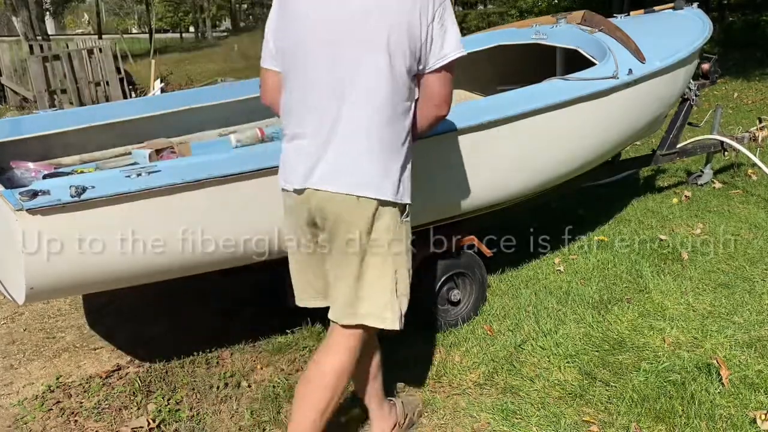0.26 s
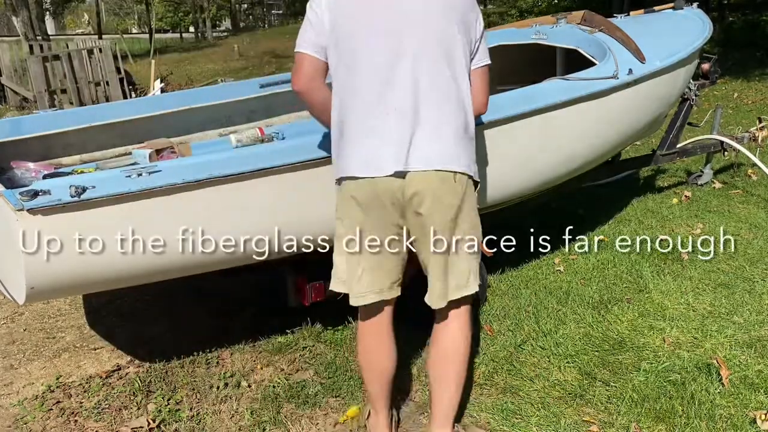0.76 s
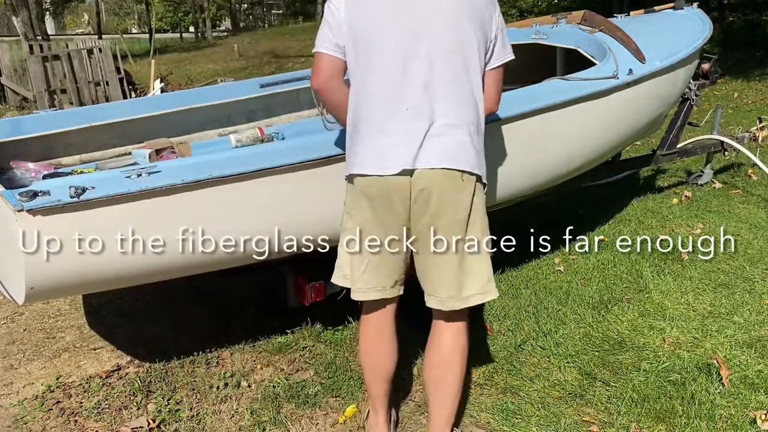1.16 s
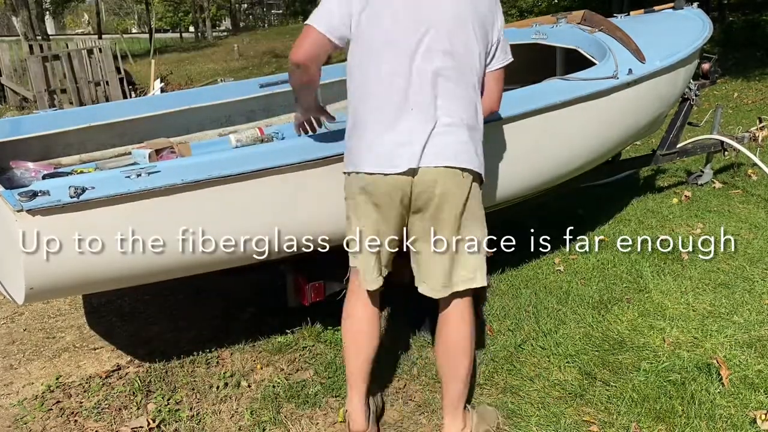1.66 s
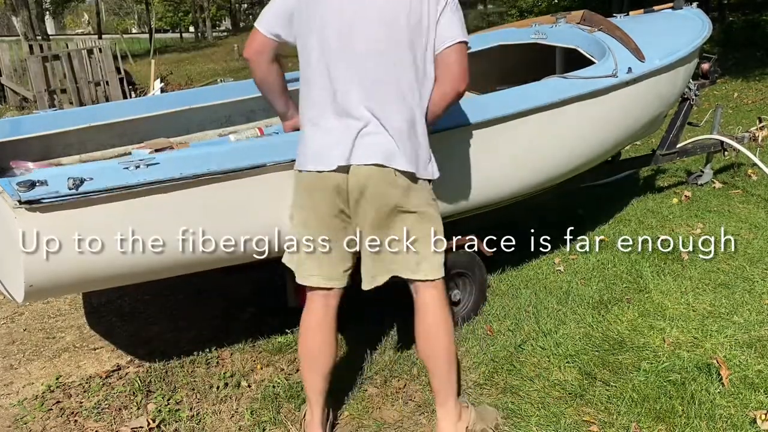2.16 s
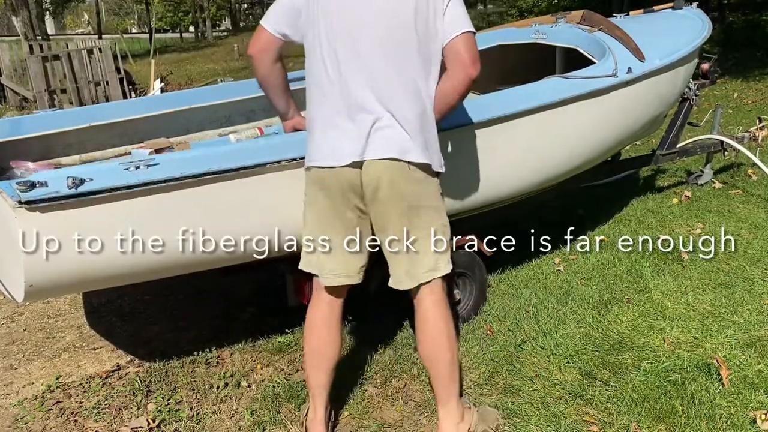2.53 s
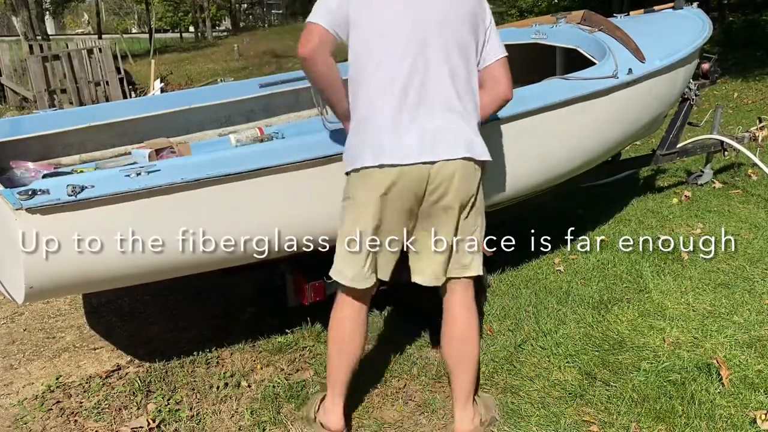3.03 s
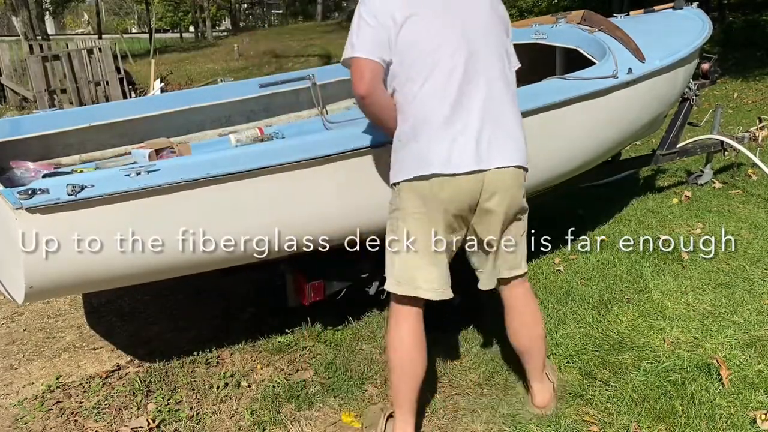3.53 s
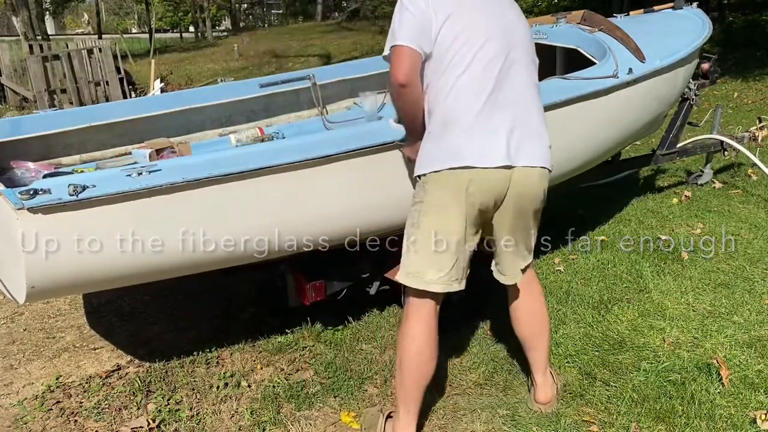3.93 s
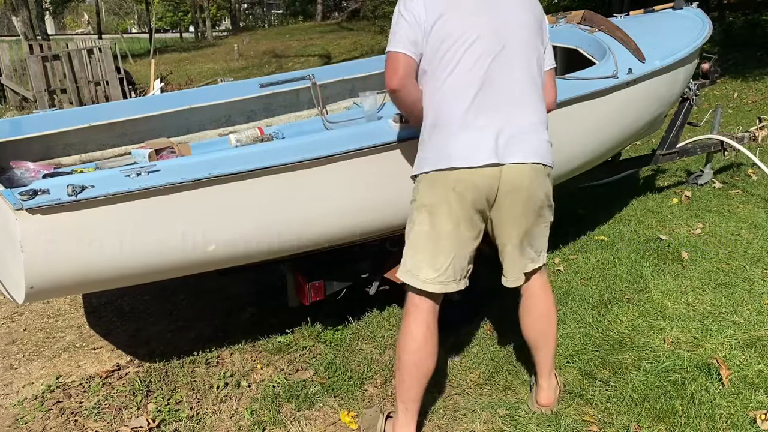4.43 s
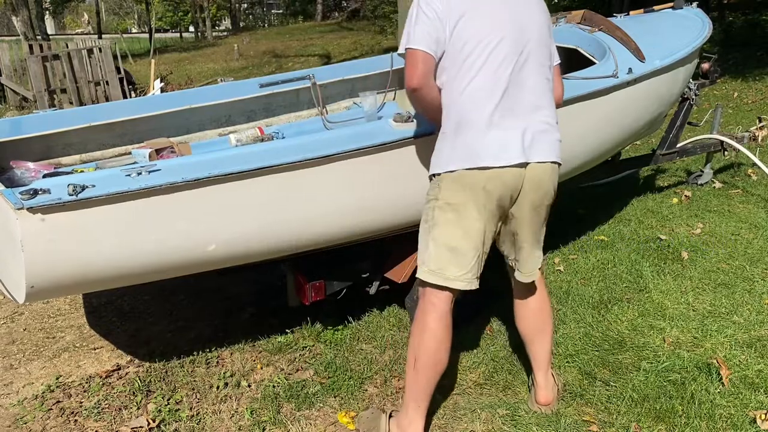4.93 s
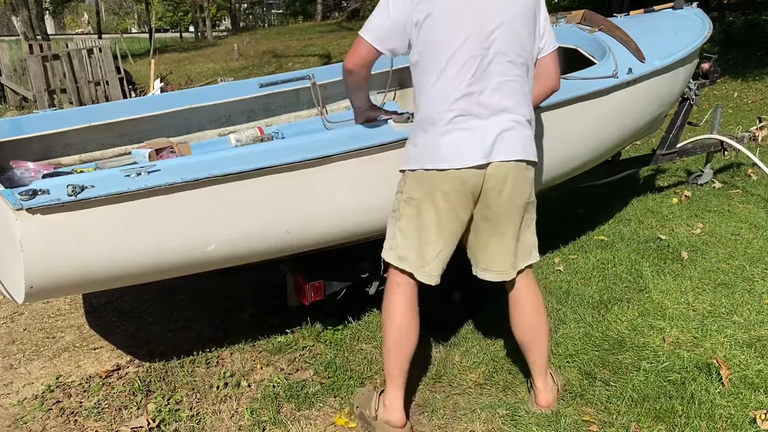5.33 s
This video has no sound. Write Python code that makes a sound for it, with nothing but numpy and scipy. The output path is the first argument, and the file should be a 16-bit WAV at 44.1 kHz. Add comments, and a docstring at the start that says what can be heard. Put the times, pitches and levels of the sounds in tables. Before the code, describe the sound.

Outdoors on a lawn, a fiberglass cap is pried off a small hollow boat hull, heard in close, dry stereo slightly left of center. From 0 to 0.3 seconds, rapid cracks, woody creaks and hollow knocks tumble together. A strong, sharp snap with a boxy hull thump lands at 0.72, followed at once by several more until 0.85. Then it is mostly quiet: tiny ticks, soft grass brushing, and a dull low bump near 1.8. From 2.33 to 2.7 a crackling, splintering run tears along, with dry treble flakes. Another pause, then medium cracks and knocks at 3.64 to 3.8. At 4.22 to 4.3 comes the loudest burst, hard bright cracks with a hollow boom. Weaker knocks follow at 4.6 and 4.83, and small crackles at 5.2 to 5.4. Underneath are a faint low motor drone, soft air hush and very faint bird chirps, mainly around 5 seconds.

```python
"""Bursts of sharp snaps come first, as a fibreglass deck cap is pried off a small boat hull on a lawn.
Breaking fibres are noise bursts under exponential decays; hull and lip are resonances they excite.
Gelcoat flakes tick as high-passed noise, and the hull rocks on its trailer as damped low sines.
Behind lie noise brushing the grass, a far motor as narrow-band noise and birds as gliding sines;
two spaced microphone ports hear the treble at different phases."""
import sys
import numpy as np
from scipy import signal
from scipy.fft import rfft, irfft, next_fast_len
from scipy.io import wavfile
from scipy.ndimage import map_coordinates

SR = 44100
rng = np.random.default_rng(int(sys.argv[2]) if len(sys.argv) > 2 else 0)


def wav_record(signal):
    """Record a signal, one row per channel, as 16-bit PCM in the file named by sys.argv[1]."""
    frames = np.transpose(np.atleast_2d(signal))
    bounded = np.clip(frames, -1, 1)
    # unit amplitude maps onto the largest positive 16-bit level
    quanta = np.round(bounded * 32767).astype(np.int16)
    wavfile.write(sys.argv[1], SR, quanta)


N = 246078

# Levels in the tables are relative ones, before the layers are mixed.
# Snaps of the joint: (time [s], crack level [dB], hull knock re crack [dB], lip clack re crack [dB],
# splinter pitch [Hz], splinter level re crack [dB])
JOINT_SNAPS = [(0.0156, -17.5, 4, -20, 7400, -14.5), (0.1, -35.5, 28, 8, 1490, -13),
               (0.113, -33.5, 0, 16, 1470, -12), (0.1319, -27, 24, 13.5, 1200, 0),
               (0.1823, -17, 4, 7, 1700, -5), (0.2121, -28, 3, 14.5, 1770, 5),
               (0.229, -23.5, 21.5, -30, 1834, -15), (0.244, -16, 2, -22, 1160, -26),
               (0.4362, -48.5, 1, 13, 1480, -4), (0.63, -35, -18, -1, 1633, 4), (.64, -41, -23, 5, 1861, 9),
               (0.65, -43, -24, -6, 1450, 2), (0.7214, -5, -1, 0, 1670, -5), (0.73, -19, 10, 5, 1520, 4),
               (0.7725, -14.5, 3, -8, 1720, -5), (.783, -17.5, -7, 1, 1954, 0),
               (0.7933, -13.5, 3.5, -13, 1260, -14), (0.816, -39, 0, -10, 1262, -14),
               (1.065, -38, -15, -21, 2020, -18), (1.153, -41, 0, 0.5, 2024, -17),
               (1.3098, -44.5, -21, 9, 1210, -2), (1.4788, -29, -25.5, -17, 1350, -9.5),
               (1.5829, -40, -24, -22, 4130, -7), (1.6047, -46.5, -13, 5, 1650, 0),
               (1.676, -43, -12, 5, 1458, -4), (1.787, -38, 5, -4, 1246, -5),
               (1.83, -35, -18, -24, 1260, -17), (2.0806, -56.5, 24.5, 23.5, 1439, -5),
               (2.142, -50, 8, 13, 1470, -11), (2.1711, -33, -1, 1.5, 1712, -15),
               (2.3328, -31, 2, -9, 2900, -11), (2.3582, -17.5, 9, 8, 2912, -7),
               (2.369, -19.5, 0, 5.5, 1290, 5.5), (2.3845, -21, -8, -13, 1310, 1),
               (2.527, -27.5, 2.5, -17, 5600, -18), (2.5612, -26.5, 12, -26, 1850, -2),
               (2.5889, -26.5, 13, 0, 4000, -8), (2.599, -27, 5, 6.5, 3035, -5),
               (2.611, -26.5, 7, 4, 5720, -5.5), (2.6827, -31, -4, -18, 2920, 0.5),
               (2.692, -35, -8, -13, 5725, 1), (2.81, -39, -8, -25, 1810, -17),
               (2.882, -42.5, -12, 3.5, 1296, -2.5), (2.9707, -48, -23, 16.5, 1280, -8),
               (3.3339, -34, -10, -13, 1834, -12), (3.6392, -27.5, 18, -4, 1243, -10),
               (3.6478, -19, -10, -16, 1385, -25), (3.6883, -18.5, -8, -20, 1490, -28),
               (3.7938, -36, 9, 4, 1461, -12), (3.807, -46, -1.5, -3, 1323, -12),
               (3.9553, -42, -35, -20, 1579, -21), (4.218, -22, 7, 10, 7194, -8),
               (4.2259, -6.5, -32, 7, 3012, -15), (4.245, -7, 0.5, 4.5, 7110, -10),
               (4.2515, -10, 3, 1, 1370, -4), (4.258, -3, 3.5, 5, 6926, -12.5),
               (4.278, 0, 0, -31, 6832, -13.5), (4.589, -44, 29, 12, 1330, -13),
               (4.6079, -36, -4.5, -9, 1252, -12.5), (4.663, -38.5, -8, -22.5, 2580, -20.5),
               (4.82, -44, 12.5, -12, 1335, -7), (4.8418, -35, 16.5, -15, 1192, -12.5),
               (5.184, -43, -8, -20, 4385, -3), (5.198, -55, -14, -6, 3300, 6),
               (5.2142, -42.5, -28, 10.5, 1650, 5.5), (5.2758, -48, -18, 15, 1350, 5),
               (5.3035, -45.5, -2.5, 13, 2980, -3), (5.3353, -28.5, -17, -10, 4340, -7),
               (5.378, -33, -19, -25, 3010, -4), (5.3925, -25, -12.5, 1, 3050, -20)]
# Pulls that tear the glue line: (grip [s], let-go [s], fibre level at grip [dB], at let-go [dB],
# hull level at grip [dB], at let-go [dB], settled pitch of the bent panel [Hz], its overtone [dB])
GLUE_TEARS = [(0, 0.058, -42.5, -55, -19.5, -33, 358, -1.5),
              (0.1, 0.119, -46, -35.5, -19.5, -12.5, 329.1, -5.5),
              (0.134, 0.221, -26, -36.5, -10.5, -15, 314.7, -1.5),
              (0.229, 0.241, -38, -40, -9.5, -13.5, 293.7, -14.5),
              (0.249, 0.297, -41, -68, -23, -30.5, 297.4, -5),
              (0.622, 0.642, -49, -38.5, -49, -53, 280.8, -6),
              (0.726, 0.748, -25, -21, 1.5, -9.5, 275.5, -5.5),
              (0.764, 0.799, -30, -28, -7, -6.5, 321.3, -9),
              (0.814, 0.866, -33.5, -69, -17, -39.5, 300.4, -5.5),
              (1.429, 1.487, -49, -63, -55, -59, 281, -4), (1.756, 1.791, -64, -42.5, -38, -35, 306, -9.5),
              (2.088, 2.226, -67, -67, -54, -46, 300, 1), (2.361, 2.39, -27, -28, -13.5, -10.5, 323, -11),
              (2.399, 2.46, -36, -42.5, -16, -30, 322.4, -3),
              (2.542, 2.559, -37.5, -36.5, -39, -45, 304, -6),
              (2.564, 2.678, -31.5, -58, -30.5, -41.5, 304.4, -4),
              (2.681, 2.698, -23, -43, -41.5, -21, 298.7, -6),
              (3.615, 3.632, -55, -64, -35.5, -45, 304, -5),
              (3.639, 3.669, -34.5, -36.5, -15.5, -9.5, 339.8, -9),
              (3.685, 3.713, -54, -64, -16, -20.5, 350.6, -13),
              (3.796, 3.818, -54, -66, -21, -27.5, 398.7, -8.5),
              (4.215, 4.232, -29, -26, -20.5, -16, 400, 0.5), (4.244, 4.267, -18, -22, -14, -9, 372, -2),
              (4.283, 4.295, -19.5, -27.5, 2, -1, 355.6, -14),
              (4.305, 4.339, -34.5, -50, -7, -19, 350, -11.5),
              (4.591, 4.602, -47, -59, -27.5, -18.5, 315.5, -0.5),
              (4.606, 4.66, -46.5, -65, -34, -43, 269.6, -5.5),
              (4.832, 4.856, -50, -51, -23, -26.5, 289.9, -8.5),
              (5.36, 5.396, -58, -45, -27, -31, 291, -9.5)]
# Resonances of the hollow hull: (frequency [Hz], width [Hz], level [dB])
HULL_MODES = [(144, 34, 0), (219, 10, 6.5), (261.7, 36, 6.5), (325.5, 83, 3.5), (348.3, 38.8, 3),
              (436.5, 48, -1), (468, 170, -6.5), (571, 205, -5.5), (731, 74, -5.5)]
# Resonances of the cap's lip: (frequency [Hz], width [Hz], level [dB])
LIP_MODES = [(812, 76, -0.5), (1106, 109, 0), (1380, 140, -3.5), (1890, 500, -9.5)]
# Spectrum of breaking fibres: (frequency [Hz], density [dB per Hz])
FIBRE_SPECTRUM = [(300, -20), (1000, -2.5), (2000, -4.5), (3000, 0.5), (5000, -4.5), (7000, -3),
                  (10000, -2.5), (13000, -11), (16500, -10)]
# Dry ticks of flaking gelcoat: (time [s], level [dB])
FLAKE_TICKS = [(.2614, -51), (1.8941, -59), (1.9057, -60), (1.953, -61), (2.5015, -43), (2.5245, -30),
               (2.5614, -30), (2.6502, -34), (2.672, -34), (2.681, -29.5)]
# The hull rocks on the trailer: (time [s], sway level [dB], bounce level [dB])
TRAILER_THUMPS = [(0.129, -47, -25), (0.719, -45, -25), (1.045, -27, -51), (1.286, -52, -52),
                  (1.447, -53, -38), (1.535, -65, -46), (1.801, -20, -30.5), (2.233, -43, -35),
                  (2.376, -42, -23), (2.608, -20.5, -28.5), (3.708, -21.5, -32.5), (4.236, -28, -16),
                  (4.623, -27, -31.5), (4.831, -29, -31.5), (5.401, -18.5, -29.5)]
# Sway, bounce and overtone of the bounce: (frequency [Hz], t60 [s], level [dB])
TRAILER_MODES = [(57.8, 0.22, -2), (98.6, 0.41, -6), (180.5, 0.21, -6)]
# Reflections off ground and hull side: (left delay [s], right delay [s], level [dB])
NEAR_BOUNCES = [(.0013, 0.0026, -13.5), (.0034, 0.0022, -15), (.0052, 0.0047, -15.5)]
# Reverberation from fence and trees: (frequency [Hz], t60 [s])
YARD_DECAY = [(100, 0.6), (300, 0.36), (1000, 0.31), (5000, 0.34), (14000, 0.11)]
# Bird calls: (time [s], length [s], start pitch [Hz], end pitch [Hz], arch midway [Hz], level [dB])
BIRD_CALLS = [(.57, 0.086, 4250, 4200, 2, -72), (4.924, 0.034, 3550, 2706, -100, -62.5),
              (5.015, 0.1, 3980, 4000, 96, -62), (5.125, 0.052, 4060, 4020, 68, -68),
              (5.529, 0.068, 4140, 4010, 47, -63)]
# Stirs of grass and cloth: (time of peak [s], level [dB], swell over 15 dB [s], fade over 15 dB [s])
GRASS_STIRS = [(.3, -62, 0.023, 0.41), (.442, -56, 0.051, 0.034), (.62, -56, 0.052, 0.046),
               (.84, -45, 0.021, 0.13), (1.312, -56.5, 0.059, 0.016), (1.492, -46, 0.068, 0.0073),
               (1.61, -62, 0.22, 0.0074), (1.684, -56, 0.11, 0.031), (1.792, -50.5, 0.058, 0.098),
               (2.18, -56.5, 0.2, 0.026), (2.337, -48, 0.0058, 0.036), (2.721, -53.5, 0.021, 0.35),
               (3.059, -51.5, 0.04, 0.016), (3.173, -51.5, 0.049, 0.27), (3.518, -57, 0.065, 0.072),
               (3.797, -54, 0.034, 0.035), (3.959, -59, 0.011, 0.019), (4.361, -51.5, 0.029, 0.42),
               (4.592, -55, 0.024, 0.047), (4.84, -51.5, 0.026, 0.064), (5.219, -54.5, 0.065, 0.0078),
               (5.403, -48.5, 0.13, 0.037), (5.57, -62, .2, .02)]
# Spectrum of the grass: (frequency [Hz], density [dB per Hz])
GRASS_SPECTRUM = [(200, 3), (600, -5.5), (1500, -0.5), (3000, -6), (5000, -9.5), (8000, -13.5),
                  (12000, -17), (16500, -19.5)]
# Spectrum of the outdoor hush: (frequency [Hz], density [dB per Hz])
AIR_SPECTRUM = [(12, -46.5), (20, -16.5), (53, 5.5), (88, -6), (122, -4), (156, -16), (222, -22),
                (1100, -30), (1220, -33), (3240, -35), (8000, -42.5), (11000, -54.5), (16000, -49)]
# Far drone: (time [s], motor level [dB], rumble level [dB])
DRONE_LEVELS = [(0, -22, -30), (.12, -40, -49), (.26, -31, -40), (.45, -58.5, -45.5), (.84, -44, -30),
                (1.2, -59, -71), (1.69, -46.5, -52), (2.21, -47.5, -50.5), (2.56, -33, -35.5),
                (2.81, -50.5, -36.5), (3.1, -56, -71), (3.6, -49, -62), (3.85, -40.5, -46.5),
                (4.32, -63, -52), (4.71, -48.5, -48.5), (5.14, -46.5, -65.5), (5.58, -45.5, -40.5)]
# Spacing of the ports: (frequency [Hz], phase by which left leads [rad])
PORT_PHASE = [(400, 0), (1800, .4), (2100, 1.4), (2600, .6), (4500, .1), (6100, .7), (6800, .2),
              (10200, -5), (11500, -6.6), (13800, -10), (16500, -12.5)]
# Left-right likeness of diffuse noise: (frequency [Hz], likeness [correlation, 0 to 1])
PORT_LIKENESS = [(60, 0.8), (240, 0.68), (950, 0.043), (3770, 0.71), (15000, 0.71)]

CRACK_T60_S, RING_T60_S, KNOCK_T60_S = 0.021, 0.031, 0.0049  # crack, splinter, hull knock
GRIP_T60_S, FIBRE_T60_S, HULL_T60_S = .011, 0.07, 0.047  # quick rise at the grip, falls after the let-go
BITE_RISE, BITE_S = .2, .004  # share by which the panel is sharp at the grip, time constant of the bend
TICK_T60_S, TICK_HZ = 0.022, 5940
TOP_HZ = 15900  # band limit


def snaps():
    """Brittle fracture: each break releases a burst of energy that decays exponentially."""
    t = np.arange(SR // 5) / SR
    crack, ring, knock, blow, clack = np.zeros((5, N + len(t)))
    for s, db, knock_db, clack_db, hz, ring_db in JOINT_SNAPS:
        start = round(s * SR)
        at = slice(start, start + len(t))
        fall = -60 * t / CRACK_T60_S
        scrape, flutter = rng.standard_normal((2, len(t)))
        # the first fibres break hardest
        first_fibres = 1 + 2.0 * np.exp(-t / 0.0014)
        crack[at] += amp(db + fall) * (1 - np.exp(-t / 0.00047)) * first_fibres
        # the splinter that lets go buzzes round a pitch of its own
        buzz = np.sin(2 * np.pi * hz * t + .13 * np.cumsum(flutter))
        ring[at] += amp(db + ring_db - 2 - 60 * t / RING_T60_S) * buzz
        knock[at] += amp(db + knock_db - 3.0 - 60 * t / KNOCK_T60_S)
        # the jolt that starts the knock
        blow[at] += amp(db + knock_db + 3.5) * np.exp(-t / 0.00027)
        clack[at] += amp(db + clack_db + 6.0 + fall) * scrape
    return crack[:N], ring[:N], knock[:N], blow[:N], clack[:N]


def tears():
    """Sustained fracture: a pull loads the glue line, and the bent panel's pitch sags as it settles."""
    tear, boom, panel_hz, overtone = np.zeros((4, N))
    for grip, let_go, fibre_db, fibre_end_db, hull_db, hull_end_db, hz, over_db in GLUE_TEARS:
        add(tear, grip, let_go, fibre_db, fibre_end_db, GRIP_T60_S, FIBRE_T60_S)
        add(boom, grip, let_go, hull_db, hull_end_db, GRIP_T60_S, HULL_T60_S)
        at = max(round((grip - GRIP_T60_S) * SR), 0)
        from_grip_s = np.abs(np.arange(at, N) / SR - grip)
        # sharpest under the bar at the grip; each pull holds until the next
        panel_hz[at:] = hz * (1 + BITE_RISE * np.exp(-from_grip_s / BITE_S))
        overtone[at:] = amp(over_db)
    return tear, boom, panel_hz, overtone


def fibres(spiky_db):
    """Superposition of many small fractures: spiky noise with the spectrum of breaking fibres."""
    return unit(filtered(grit(spiky_db), lambda hz: amp(along(FIBRE_SPECTRUM, hz))))


def bent_panel(panel_hz, overtone):
    """Stick-slip oscillation: it locks loosely onto the panel, so pitch and level waver."""
    turn = 2 * np.pi * np.cumsum(panel_hz + 32 * wobble(120)) / SR
    return (np.sin(turn) + overtone * np.sin(1.65 * turn)) * amp(1.9 * wobble(70))


def joint():
    """Excitation and resonance: snaps and tearing shake the fibres, the hollow hull and the cap's lip."""
    crack, ring, knock, blow, clack = snaps()
    tear, boom, panel_hz, overtone = tears()
    push = knock + boom
    hull = resonate(push * amp(3.5) * grit(spiky_db=3.5) + blow, HULL_MODES)
    # the bent panel also sounds by itself
    hull += amp(-6.0) * push * bent_panel(panel_hz, overtone)
    lip_drive = clack + amp(6.5) * np.sqrt(tear * boom) * grit(spiky_db=-0.5)
    lip = resonate(lip_drive, LIP_MODES)
    cracking = amp(-13.5) * crack * fibres(spiky_db=6.1)
    tearing = amp(-5) * tear * fibres(spiky_db=2.5)
    return cracking + ring + tearing + hull + lip


def flakes():
    """Impulsive radiation of light chips: short puffs of noise, treble only."""
    env = np.zeros(N)
    for s, db in FLAKE_TICKS:
        add(env, s, s, db, db, .003, TICK_T60_S)

    def treble(f):
        highpass = (1j * f / (TICK_HZ + 1j * f)) ** 4
        return highpass / (1 + 1j * f / (1.5 * TICK_HZ)) ** 3
    return env * unit(filtered(rng.standard_normal(N), treble))


def trailer():
    """Damped harmonic motion: soft low swings with a slow start."""
    out, t = np.zeros(N + SR), np.arange(SR // 2) / SR
    onset = 1 - np.exp(-t / 0.005)
    sway, bounce, over = [amp(db - 60 * t / t60) * onset * np.sin(2 * np.pi * hz * t)
                          for hz, t60, db in TRAILER_MODES]
    for s, sway_db, bounce_db in TRAILER_THUMPS:
        out[round(s * SR):][:len(t)] += amp(sway_db) * sway + amp(bounce_db) * (bounce + over)
    return out[:N]


def bounces(x):
    """Early reflection: near surfaces return middle and treble to each port at its own delay."""
    def response(f):
        echo = sum(amp(db) * np.exp(-2j * np.pi * f * np.array([[left], [right]]))
                   for left, right, db in NEAR_BOUNCES)
        return echo * (1j * f / (700 + 1j * f)) ** 2
    return filtered(x, response)


def yard(x):
    """Diffuse reverberation: each frequency dies at its own speed; bass passes the fence unanswered."""
    hz, t, z = signal.stft(rng.standard_normal((2, SR // 2)), SR, nperseg=256)
    decay = amp(-60 * t / along(YARD_DECAY, hz)[:, None])
    tail = signal.istft(z * decay, SR, nperseg=256)[1]
    x = filtered(x, lambda f: 1j * f / (400 + 1j * f))
    delayed = np.pad(x, (300, 0))[None]  # delay in samples
    return signal.fftconvolve(delayed, tail / np.linalg.norm(tail[0]), axes=1)[:, :N]


def birds():
    """Frequency modulation: thin, slightly husky whistles, with a fainter second note on held ones."""
    out = np.zeros(N + SR)
    for s, length, from_hz, to_hz, arch_hz, db in BIRD_CALLS:
        u = np.linspace(0, 1, round(length * SR))
        arch = np.sin(np.pi * u)
        pitch_hz = from_hz + (to_hz - from_hz) * u + arch_hz * arch
        husk = 0.03 * np.cumsum(rng.standard_normal(len(u)))
        phase = 2 * np.pi * np.cumsum(pitch_hz) / SR + husk
        held = to_hz > .9 * from_hz
        notes = np.sin(phase) + .3 * held * np.sin(1.42 * phase)
        out[round(s * SR):][:len(u)] += amp(db) * np.sqrt(np.abs(arch)) * notes
    return out[:N]


def grass():
    """Friction noise: each brush of feet swells and fades with a fine random flicker."""
    brushing_db = 2 * wobble(25) + 2 * wobble(400)
    stir = np.zeros(N)
    for s, db, swell, fade in GRASS_STIRS:
        add(stir, s, s, db, db, swell * 60 / 15, fade * 60 / 15)  # times over 15 dB become t60
    return stir * amp(brushing_db) * rush(GRASS_SPECTRUM)


def drone():
    """Narrow-band resonance of noise: a fuzzy far motor and a lumpy rumble."""
    motor_db, rumble_db = curves(DRONE_LEVELS)
    motor = unit(resonate(rng.standard_normal(N), [(90.0, 3.3, 2), (111.2, 9.4, 2.5)]))
    narrow = resonate(rng.standard_normal(N), [(54.4, 9.5, 0)])
    rumble = unit(resonate(narrow, [(56, 290, 0)]))
    far = amp(motor_db) * motor + amp(rumble_db + 2.7 * wobble(6.7)) * rumble
    return far * amp([[.5], [-.5]])  # slightly left


def background():
    """Incoherent addition: drone, grass underfoot and a steady outdoor hush."""
    return drone() + grass() + amp(-48.0) * rush(AIR_SPECTRUM)


def rush(spectrum):
    """Partial coherence: stereo noise of rms 1, partly alike in both ports."""
    def response(hz):
        turn = np.arccos(np.clip(along(PORT_LIKENESS, hz), -1, 1)) / 2
        return amp(along(spectrum, hz)) * [np.cos(turn), np.sin(turn)]
    mid, side = filtered(rng.standard_normal((2, N)), response)
    return unit(spaced(mid) + np.array([side, -side]))


def spaced(x):
    """Interaural-style phase difference: one source at both ports, half the phase gap on each side."""
    return filtered(x, lambda hz: np.exp(.5j * along(PORT_PHASE, hz) * np.array([[1], [-1]])))


def resonate(x, modes):
    """Modal superposition: x through causal resonances of alternating sign."""
    def response(f):
        return sum((-1) ** k * amp(db) * 1j * f * width / (hz * hz - f * f + 1j * f * width)
                   for k, (hz, width, db) in enumerate(modes))
    return filtered(x, response)


def filtered(x, response):
    """Linear filtering: the spectrum of x times a complex response of frequency."""
    m = next_fast_len(N + SR // 2)
    return irfft(rfft(x, m) * response(np.fft.rfftfreq(m, 1 / SR)), m)[..., :N]


def grit(spiky_db):
    """Amplitude modulation of noise: rms 1, made of grains with uneven sizes."""
    return unit(rng.standard_normal(N) * amp(spiky_db * wobble(700)))


def wobble(rate):
    """Interpolated randomness: a smooth random curve, rate knots a second."""
    knots = rng.standard_normal(int(N * rate / SR) + 4)
    return map_coordinates(knots, [np.arange(N) * rate / SR])


def add(out, start, end, start_db, end_db, rise_t60, fall_t60):
    """Exponential envelope, added to out: rise, a straight slope in dB from start to end, fall."""
    s = [start - max(rise_t60, .002), start, max(end, start + 1 / SR), end + max(fall_t60, .004)]
    at = np.arange(max(round(s[0] * SR), 0), min(round(s[-1] * SR), N))
    out[at] += amp(np.interp(at / SR, s, [start_db - 60, start_db, end_db, end_db - 60]))


def curves(rows):
    """Linear interpolation in time: one value per sample for each column after the time."""
    s, *cols = np.transpose(rows)
    return [np.interp(np.arange(N) / SR, s, c) for c in cols]


def along(points, hz):
    """Logarithmic frequency scale: (Hz, value) points interpolated on a log axis."""
    f, v = np.transpose(points)
    return np.interp(np.log(hz + 1), np.log(f + 1), v)


def amp(db):
    """Decibel law: dB to amplitude gain."""
    return 10 ** (np.asarray(db) / 20)


def unit(x):
    """Power normalisation: x at rms 1."""
    return x / np.sqrt(np.mean(x ** 2) + 1e-20)


def scene():
    """Superposition of direct, reflected and diffuse sound; the boat stands a little to the left."""
    boat, far = joint() + flakes(), birds()
    direct = spaced(boat + trailer() + far) * amp([[.6], [-.6]])
    return direct + bounces(boat) + amp(-13.5) * yard(boat + far) + background()


def record(dry):
    """Saturation and band limiting: rounds off the highest peaks, drops deepest bass and top treble."""
    held = dry / (1 + np.abs(dry / .95) ** 5) ** (1 / 5)

    def band(hz):
        top = 1 / (1 + (hz / TOP_HZ) ** 120)
        return top / (1 + (38 / (hz + 1)) ** 4)
    return filtered(held, band)


dry = scene()
out = record(dry)
wav_record(out)
```